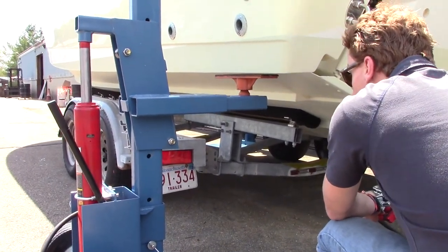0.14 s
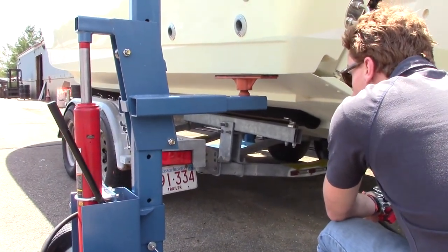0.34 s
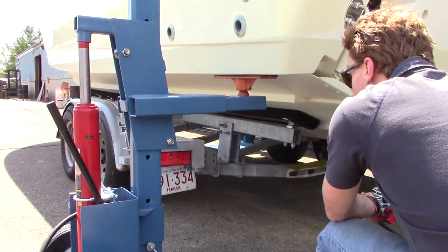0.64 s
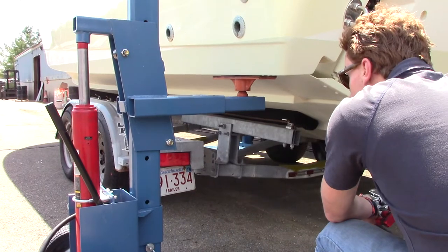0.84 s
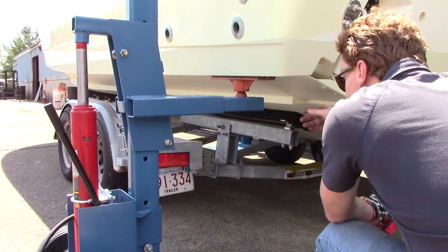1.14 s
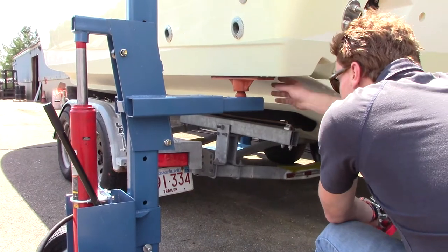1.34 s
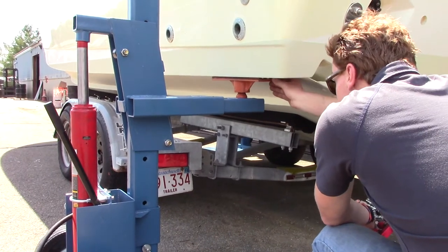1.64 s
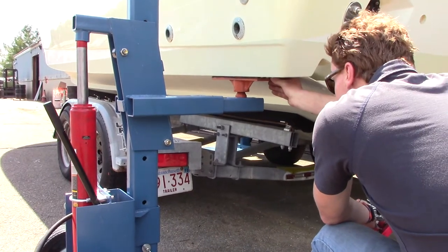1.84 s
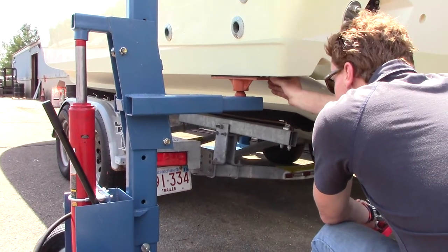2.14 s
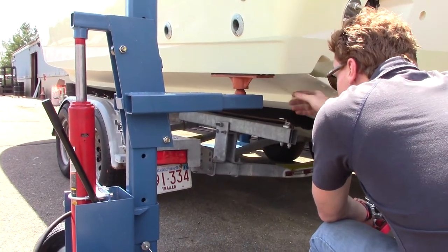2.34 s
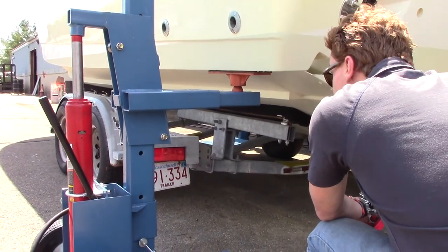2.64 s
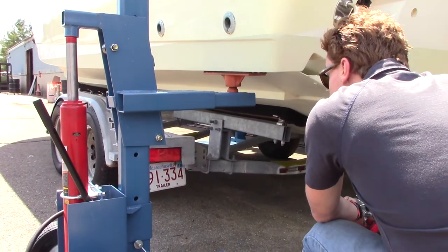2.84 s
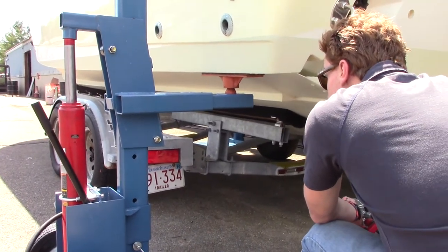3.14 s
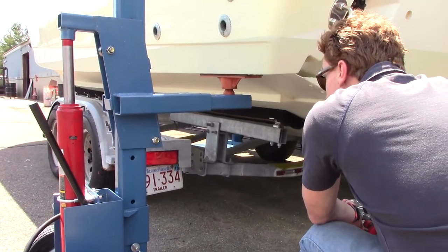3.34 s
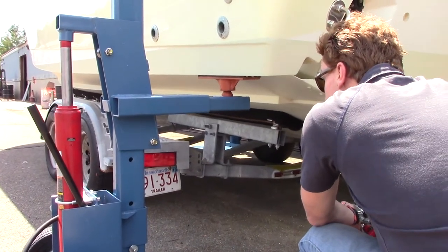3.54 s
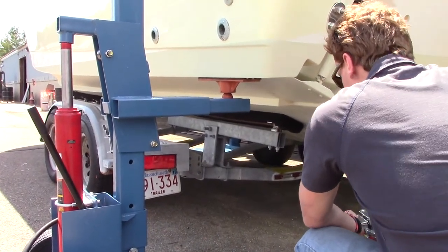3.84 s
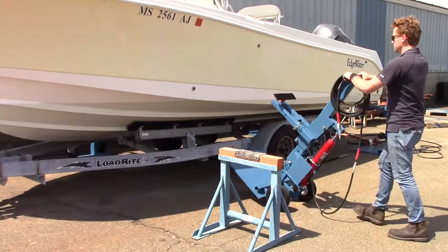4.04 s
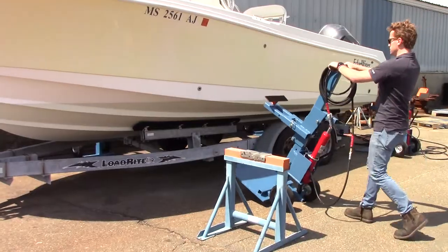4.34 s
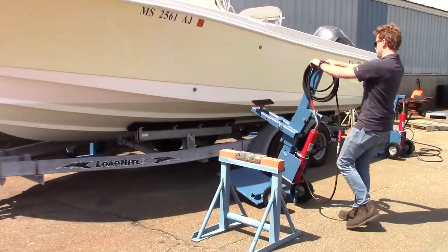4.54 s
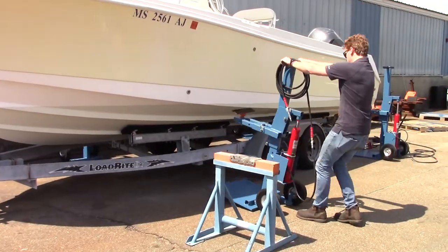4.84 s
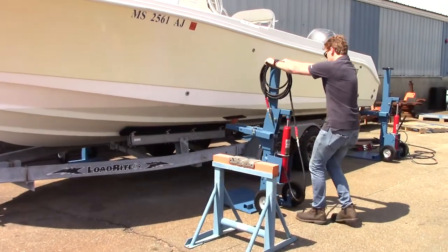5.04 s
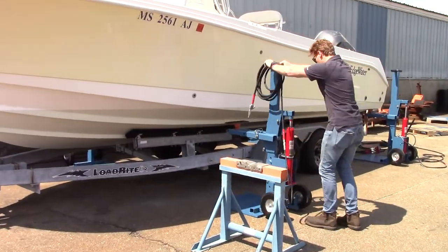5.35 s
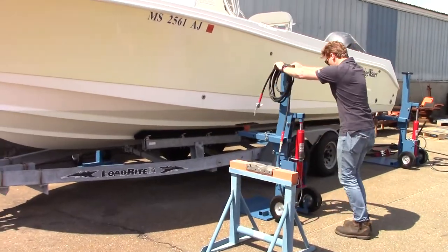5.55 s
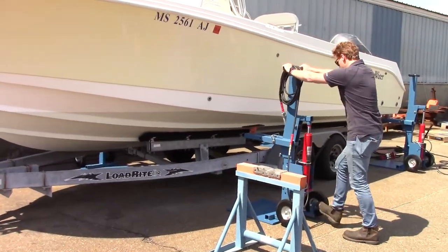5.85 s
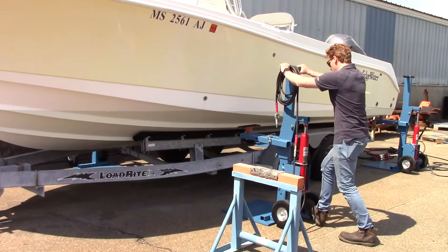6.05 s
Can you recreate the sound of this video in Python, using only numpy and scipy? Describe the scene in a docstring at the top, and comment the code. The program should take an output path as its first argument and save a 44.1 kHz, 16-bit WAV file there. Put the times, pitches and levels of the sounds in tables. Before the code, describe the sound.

In an open yard, a pneumatic jack sputters in a fast, bright chatter of air bursts, its last strokes spacing out before stopping. Low wind buffets the microphone in the pause, with a faint hoarse chirp. The pump restarts slightly unevenly, harder and more metallic, then stalls. Next comes quiet distant hiss, one soft tubular tap, wind thuds, and a cluster of loose steel clanks and grit scrapes with slight outdoor echo.

```python
"""An air-driven hydraulic jack lifts a boat in a yard: a run of rapid exhaust puffs (choked jets through
a muffler) and piston knocks (struck resonances) slows to a halt when the air is shut off, while wind
bumps the microphone (lumps of low noise). A bird chirps in the pause (gliding tones); a second run follows.
The near air then gives way to a faint, farther hiss, a steel tube is tapped (decaying modes), and
a wheeled steel jack is tipped upright and rattles into place (chattering contacts ring its frame)."""
import sys
import numpy as np
from scipy import signal
from scipy.fft import rfft, irfft
from scipy.io import wavfile
from scipy.ndimage import uniform_filter1d

SR = 44100
rng = np.random.default_rng(int(sys.argv[2]) if len(sys.argv) > 2 else 0)


def wrap_up_sound(samples):
    """Save the sound to the file named by the first command line argument, as 16-bit audio."""
    columns = np.atleast_2d(samples).T
    # keep every value between -1 and 1, then stretch to whole-number steps
    tamed = np.clip(columns, -1, 1)
    steps = np.round(tamed * 32767).astype(np.int16)
    wavfile.write(sys.argv[1], SR, steps)


N = 272979
T = np.arange(N) / SR  # s
HZ = np.maximum(np.arange(N // 2 + 1) * SR / N, 1)

# Most spectra and mode levels are relative; the tube's mode levels are used as they stand.
# yard air beside the boat: frequency_hz, density_db (per Hz)
NEAR_AIR_SPECTRUM = [(18, -71), (30, -61), (131, -11.5), (384, -7), (426, -7), (600, -13.5), (889, -12),
                     (1430, -16), (2610, -20.5), (4080, -22), (4780, -24), (12300, -28), (16000, -41)]
# hiss from farther off: frequency_hz, density_db (per Hz)
FAR_AIR_SPECTRUM = [(30, -30), (100, -20), (200, -12.5), (300, 0.5), (480, 0.5), (700, 2), (1400, -2.5),
                    (3800, -5.5), (5100, -11.5), (6300, -4), (8500, -3.5), (10200, -8), (11600, -17),
                    (14000, -16), (16000, -26)]
NEAR_DB, FAR_DB = -43.5, -43.5  # rms levels
MOVE_S = 3.98  # the near air starts to give way to the far hiss

# runs of the pump: first_stroke_s, air_shut_off_s, stroke_rate_hz
PUMP_RUNS = [(.0018, .914, 19.373), (2.6238, 3.4075, 18.684)]
# levels of each run at full pressure, before trims: exhaust_db, casing_ring_db, piston_thud_db, casing_buzz_db
PUMP_LEVELS = [(-8, -27, -42.5, -35), (-5, -19, -29, -29.5)]
# brief falters of the pump: middle_s, rate_loss_hz
PUMP_FALTERS = [(2.658, 4.6), (2.9022, 4.033), (3.2068, 1.316)]
FALTER_S = .0736  # half length
# with the air off the rate falls steadily (strokes/s per s) until the piston stalls (strokes/s)
COAST_LOSS, STALL_RATE = 29.59, 3
FILL_S = 0.041  # air flows this long before the first stroke
EARLY_S = .0025  # at full pressure the exhaust port opens this far ahead of the end of the stroke
# as the pressure drains, strokes tend to one slow, full puff and a hard knock (dB before trims)
SLOW_PUFF_DB, SLOW_RING_DB = -2.5, -13
# shape of a puff: how fast the port opens, how steeply the flow collapses
OPENING, COLLAPSE = 20, 2.6
# exhaust jet: frequency_hz, density_db (per Hz)
JET_SPECTRUM = [(500, -36), (800, -43), (1100, -31), (1700, -9), (2500, -9), (3400, -5.5), (4800, -11.5),
                (5800, -4.5), (6900, 2), (8700, 0.5), (10000, -8), (11300, -15.5), (13000, -19.5),
                (16000, -25.5)]
# peaks and notches of the muffler: frequency_hz, width_hz (before the lower limit), gain_db
MUFFLER_PEAKS = [(2324, 116, -12), (2596, 190, -5.5), (3190, 70, 3.5), (3617, 200, 7.5), (3750, 77, -9),
                 (4010, 210, -5), (4140, 84, 7), (4680, 450, -0.5), (4840, 250, -4), (5460, 290, 3),
                 (5510, 230, 2.5), (5660, 290, -4.5), (5840, 380, -2), (6010, 123, 7), (6620, 210, -1),
                 (6890, 160, 1.5), (7440, 200, -2.5), (7600, 120, -7), (8130, 120, -7.5), (8145, 63, 7.5),
                 (9300, 91, -3), (9730, 90, -6), (10700, 160, -4), (11400, 220, -7), (12150, 360, 4)]
NARROWEST_HZ = 70  # lower limit of the muffler widths
# modes of the pump casing: frequency_hz, width_hz, level_db
CASING_MODES = [(834.4, 28, 1), (916, 39, 3.5), (989, 17, -6), (1235, 81, -7.5), (1306, 51, -1),
                (1379, 32, -10), (1617, 76, -1), (1793, 53, -6.5), (1905, 200, -5.5), (2110, 71, 0),
                (2273, 140, 2), (2522, 62, -1.5)]
# modes of the piston thud: frequency_hz, width_hz, level_db
PISTON_MODES = [(202, 35, 4), (322, 220, 6), (445, 84, 3.5)]

# wind eddies: frequency_hz, density_db (per Hz)
WIND_SPECTRUM = [(30, -35), (60, -8), (110, -9.5), (170, -1), (290, 1.5), (420, -6.5), (600, -11.5),
                 (1000, -37), (2000, -48)]
# strongest wind bumps: start_s, peak_db (before trim), pitch_hz, rise_s
WIND_BUMPS = [(0.042, -34, 226, 0.0092), (0.502, -24.5, 272.8, 0.0037), (1.466, -31.5, 267.2, .0066),
              (1.576, -22, 319.5, 0.0026), (1.61, -32, 315, 0.0084), (1.656, -16.5, 282.2, 0.0067),
              (1.7, -27, 266.4, 0.012), (1.772, -29, 208, 0.0066), (2.428, -31.5, 349.7, 0.01),
              (2.489, -29, 298.2, 0.0076), (2.553, -23, 275.6, 0.0074), (3.925, -14, 213.6, 0.011),
              (5.237, -18, 299.1, .0072), (5.278, -21.5, 397, 0.015), (5.302, -15.5, 268, .011),
              (5.351, -18, 283, 0.0087), (5.769, -19, 247, 0.011), (5.789, -22.5, 407, 0.0094),
              (6.174, -20, 366.7, 0.01)]
# gusts: middle_s, level_db (before trim), half_length_s
WIND_GUSTS = [(1.33, -39.5, 0.22), (1.68, -33, 0.061), (2.0, -47.5, 0.24), (2.56, -35, 0.14),
              (3.15, -37.5, 0.51), (3.72, -29.5, 0.23), (5.28, -38, 0.23), (5.84, -38, 0.18)]
WIND_HZ = 271.2  # pitch of the average eddy
LOW_CUT_HZ = 95  # the microphone passes little wind below this pitch
CALM_DB, LUMPY_DB = -56.5, 3.5  # breeze between gusts (before trim), and how lumpy the wind is

# bird syllables: start_s, length_s, start_pitch_hz, top_pitch_hz, level_db (before trim)
BIRD_CHIRPS = [(1.876, 0.041, 4160, 4450, -33), (1.934, .02, 3570, 3960, -33),
               (1.957, .054, 2700, 4440, -36)]
# each syllable rises to its top at this share of its length, then drops to one closing pitch
CHIRP_TURN, CHIRP_END_HZ = .6, 2900

TAP_S = 4.063
# modes of the tapped steel tube: frequency_hz, level_db, t60_s
TUBE_MODES = [(296, -44, 2), (716, -41.5, .7), (877, -58, 0.45), (1583, -39, .08), (2218, -42, .25),
              (2400, -43, .07)]

# blows on the wheeled jack: start_s, clank_db, clank_pitch_hz, bright_rattle_db (before trims)
JACK_BLOWS = [(5.012, -23.5, 1860, -24), (5.037, -21.5, 2600, -17.5), (5.163, -22.5, 2374, -30.5),
              (5.214, -25, 1500, -31), (5.247, -22, 1650, -24), (5.315, -21, 2064, -34),
              (5.332, -14.5, 2150, -34), (5.342, -13.5, 1550, -44), (5.361, -16.5, 1430, -46),
              (5.504, -31.5, 2000, -38), (5.515, -31.5, 1720, -41), (5.54, -39, 2320, -56),
              (5.874, -14, 2730, -25.5), (6.133, -35, 1392, -43), (6.163, -28, 1376, -41)]
# modes of its steel frame: frequency_hz, width_hz, level_db
FRAME_MODES = [(346.2, 17, 20), (663.7, 19.5, -9), (1039.5, 33, 9), (1335, 30, 10), (1450, 23.5, -2),
               (1590, 13.7, 11), (1686, 23, 3), (1932, 63, 14.5), (2060, 18, -18), (2280, 20, -17),
               (2390, 35, 11), (2500, 73, 6), (2670, 32.8, 6), (2880, 42, -7), (3230, 26, 7),
               (3460, 18, -9), (3760, 51, 13.5), (6340, 62, 14.5), (7260, 64, 12)]
# wheels and steel foot scrape over gritty asphalt: middle_s, level_db (before trims), half_length_s
JACK_SCRAPES = [(5.04, -32.5, .04), (5.18, -34, 0.073), (5.26, -27.5, 0.032), (5.358, -29, 0.025),
                (5.89, -39.5, 0.15), (6.18, -34.5, 0.067)]
# grit: frequency_hz, gain_db
GRIT_SPECTRUM = [(60, -53), (400, -4), (1000, -3.5), (1600, -4.5), (3200, -2.5), (4800, -11), (8000, -13.5),
                 (14000, -37)]
# every blow dies at the same rate and weakens away from its pitch
CLANK_DECAY_S, CLANK_LOSS_DB_PER_OCTAVE = 0.014, 16

# phase between the two channels: frequency_hz, left_lead_rad
CHANNEL_LEAD = [(3800, 0), (6000, .14), (8500, .23), (10000, .45), (11500, 0)]
# level between the channels: frequency_hz, left_minus_right_db
CHANNEL_TILT = [(4500, 0), (6000, .5), (9000, .2), (10500, 2), (13000, 0)]
# stereo width: frequency_hz, side_level_db (relative to the shared sound)
STEREO_WIDTH = [(100, -45), (400, -42), (1000, -36), (3000, -33), (4800, -16), (6500, -21), (8500, -19.5),
                (11000, -11), (13000, -25)]
WIND_SIDE_DB = -25  # stereo width of the wind, relative to the shared wind
CUTOFF_HZ = 15900


def from_db(db):
    """A level in decibels is a logarithm of amplitude; return the gain."""
    return 10 ** (np.asarray(db) / 20)


def rms_one(x):
    """Dividing by the root mean square leaves unit power."""
    return x / np.sqrt(np.mean(x ** 2) + 1e-20)


def at_hz(points):
    """A spectrum interpolated along log frequency, at every frequency bin."""
    hz, value = np.transpose(points)
    return np.interp(np.log(HZ), np.log(hz), value)


def noise(spectrum):
    """White noise weighted by a spectrum is coloured noise, rms 1."""
    spectrum_of_white = rfft(rng.standard_normal(N))
    return rms_one(irfft(spectrum_of_white * from_db(at_hz(spectrum)), N))


def band(x, low_hz, high_hz):
    """A causal band-pass keeps the frequencies between two limits."""
    edges = [low_hz, min(high_hz, .45 * SR)]
    return signal.sosfilt(signal.butter(2, edges, "band", fs=SR, output="sos"), x)


def bursts(times, levels_db, lengths, shape):
    """Independent bursts add in power; shape takes the age in lengths."""
    power = np.zeros(N)
    lengths = np.maximum(lengths + 0 * times, 1e-3)
    for s, level_db, length in zip(times, levels_db, lengths):
        span = slice(max(int(s * SR) + 1, 0), int((s + 10 * length) * SR))
        age = np.maximum(T[span] - s, 0) / length
        power[span] += (from_db(level_db) * shape(age)) ** 2
    return np.sqrt(power)


def fade(age):
    """A struck body starts suddenly and decays exponentially."""
    return np.exp(-age)


def swell(age):
    """A passing eddy gives a rounded bump that tops at age 1 and trails off."""
    return age ** 2 * np.exp(2 - 2 * age)


def swells(rows):
    """Smooth Gaussian rises and falls add in power."""
    power = sum((from_db(level_db) * np.exp(-((T - s) / length) ** 2)) ** 2 for s, level_db, length in rows)
    return np.sqrt(power)


def resonate(x, modes):
    """Parallel resonances share out the power of white noise by the modes' levels."""
    out = 0
    for hz, width, level_db in modes:
        r = np.exp(-np.pi * width / SR)  # pole radius
        poles = [1, -2 * r * np.cos(2 * np.pi * hz / SR), r * r]
        gain = from_db(level_db) * np.sqrt((1 - r * r) / 2)
        out = out + gain * signal.lfilter([1, 0, -1], poles, x + 1e-18)
    return out / np.linalg.norm(from_db(np.array(modes)[:, 2]))


def yard(x, wet_db, t60, bright_t60, first_s):
    """Diffuse scatter from hull, trailer and sheds decays exponentially; the treble dies sooner."""
    t = T[:SR]
    dull = band(rng.standard_normal(SR), 225, 5600) * from_db(-60 * t / t60)
    bright = band(rng.standard_normal(SR), 2300, 15200) * from_db(-60 * t / bright_t60)
    tail = (dull + bright) * np.minimum(t / first_s, 1) ** 2
    return x + from_db(wet_db) * signal.fftconvolve(x, tail / np.linalg.norm(tail))[:N]


def background():
    """Outdoor air is steady broadband noise; the near air gives way to a distant hiss."""
    far = np.clip((T - MOVE_S) / 0.024, 0, 1)
    near_air = from_db(NEAR_DB) * noise(NEAR_AIR_SPECTRUM)
    far_air = from_db(FAR_DB) * noise(FAR_AIR_SPECTRUM)
    return (1 - far) * near_air + far * far_air


def motor():
    """Stroke times integrate the stroke rate; the pressure (0-1) goes with the square of that rate."""
    times, pressure = [], 0
    falter = sum(loss * np.exp(-((T - s) / FALTER_S) ** 2) for s, loss in PUMP_FALTERS)
    for start, shut, full_rate in PUMP_RUNS:
        coast = COAST_LOSS * np.maximum(T - shut, 0)
        rate = np.maximum(full_rate - falter - coast, 0)
        begun = np.ceil(np.cumsum(rate * (T >= start)) / SR)  # strokes begun so far
        times += list(T[(np.diff(begun, prepend=0) > 0) & (rate > STALL_RATE)])
        filling = np.clip((T - start + FILL_S) / 0.022, 0, 1)
        pressure = pressure + (rate / full_rate) ** 2 * filling
    return np.array(times), pressure


def run_levels(times):
    """Each run has its own strength: the four levels of the run under way at these times."""
    starts = np.array(PUMP_RUNS)[:, 0] - FILL_S
    return np.array(PUMP_LEVELS)[np.searchsorted(starts, times) - 1].T


def linger(envelope, t60):
    """In a diffuse echo the power of a noise builds up and leaks away exponentially."""
    r = from_db(-120 / (t60 * SR))  # 120, since it acts on power
    return np.sqrt(signal.lfilter([1 - r], [1, -r], envelope ** 2 + 1e-18))


def muffle(x):
    """Muffler resonances and cancellations form a chain of narrow peaks and notches."""
    for hz, width, level_db in MUFFLER_PEAKS:
        g = from_db(level_db / 2)
        c = -2 * np.cos(2 * np.pi * hz / SR)
        a = np.pi * max(width, NARROWEST_HZ) / SR
        x = signal.lfilter([1 + a * g, c, 1 - a * g], [1 + a / g, c, 1 - a / g], x + 1e-18)
    return x


def puff(age):
    """Choked flow rises as the port opens, holds, then collapses."""
    return (1 - np.exp(-age * OPENING)) * np.exp(-.8 * age ** COLLAPSE)


def exhaust(s, pressure, puff_s=0.016, feed_s=0.018, jet_db=-3.5, leak_db=-15.0,
            echo_db=-10, echo_t60=0.19, dull_db=-18, dull_t60=0.36, feed_power=0.9):
    """Each stroke dumps the air cylinder, and the turbulent jet makes noise as it flows."""
    valve = pressure ** feed_power
    drive = np.interp(s, T, valve)
    run_db = run_levels(s)[0]
    exhaust_db = run_db + (SLOW_PUFF_DB - run_db) * (1 - drive) ** 3
    lengths = puff_s + feed_s * drive  # an open valve feeds the puff a little longer
    puffs = bursts(s - EARLY_S * drive, exhaust_db, lengths, puff)
    leak = from_db(run_levels(T)[0] + leak_db) * valve
    flow = from_db(jet_db) * np.hypot(puffs, leak)
    # hull and ground scatter the hiss back; its lower part lasts longest
    jet = np.hypot(flow, from_db(echo_db) * linger(flow, echo_t60)) * noise(JET_SPECTRUM)
    low_hiss = rms_one(band(rng.standard_normal(N), 920, 4260))
    dull = from_db(dull_db) * linger(flow, dull_t60) * low_hiss
    return muffle(jet + dull)


def pump(casing_db=-3, rebound_s=.013, rebound_db=-3, thud_db=26, slow_thud_db=-5,
         ring_scatter_db=3, thud_scatter_db=4.0, buzz_power=.8):
    """Impact excites modes: the piston knocks at its stop, the cylinder vents, the piston slaps back."""
    s, pressure = motor()
    drive = np.interp(s, T, pressure)
    _, ring_db, knock_db, _ = run_levels(s)
    chance = rng.standard_normal((len(s), 2))
    ring_db = SLOW_RING_DB + drive * (ring_db - SLOW_RING_DB + ring_scatter_db * chance[:, 0])
    knock_db = knock_db + slow_thud_db * (1 - drive) + thud_scatter_db * chance[:, 1]
    knocks = s - .004 * drive  # a hard-driven piston arrives just ahead of the exhaust
    contacts = bursts(knocks, ring_db, 0.0065, fade)
    contacts = contacts + bursts(s + rebound_s, ring_db + rebound_db, 0.023, fade)
    buzz = from_db(run_levels(T)[-1]) * pressure ** buzz_power  # the casing buzzes while air flows
    shaking = np.hypot(from_db(casing_db) * contacts, buzz) * rng.standard_normal(N)
    casing = resonate(shaking, CASING_MODES)
    pushes = np.zeros(N)
    pushes[np.maximum(knocks * SR, 0).astype(int)] = from_db(knock_db + thud_db)
    thuds = band(resonate(pushes, PISTON_MODES), 157, 470)
    return exhaust(s, pressure) + band(casing, 880, 12600) + thuds


def wind(gust_db=-4, bump_db=-3):
    """Eddies at the microphone port: a lumpy murmur and single bumps, higher when they pass faster."""
    s, peak_db, hz, length = np.transpose(WIND_BUMPS)
    eddies = signal.hilbert(noise(WIND_SPECTRUM))
    # evened in level, then read faster or slower
    even = eddies.real / np.sqrt(uniform_filter1d(np.abs(eddies) ** 2, size=400) / 2)
    travel = np.cumsum(np.interp(T, s + length, hz) / WIND_HZ) % N
    passing = np.interp(travel, np.arange(N), even)
    bumps = bursts(s, peak_db + bump_db, length, swell) * passing
    breeze = np.hypot(swells(WIND_GUSTS), from_db(CALM_DB))
    lumps = rms_one(band(rng.standard_normal(N), 7, 26))
    murmur = breeze * from_db(gust_db + LUMPY_DB * lumps) * noise(WIND_SPECTRUM)
    return signal.sosfilt(signal.butter(2, LOW_CUT_HZ, "high", fs=SR, output="sos"), murmur + bumps)


def bird(level_db=-5, waver_hz=170, crescendo_db=6):
    """Frequency modulation: three arched, hoarse whistles from some way off, weighted to their ends."""
    out = 0
    for s, length, start_hz, top_hz, db in BIRD_CHIRPS:
        age = np.clip((T - s) / length, 0, 1)
        arch = np.sqrt(4 * age * (1 - age))
        gain = from_db(db + level_db + crescendo_db * (age - 1.5)) * arch
        glide = np.interp(age, [0, CHIRP_TURN, 1], [start_hz, top_hz, CHIRP_END_HZ])
        pitch = glide + waver_hz * rms_one(band(rng.standard_normal(N), 80, 368))
        out = out + gain * np.sin(2 * np.pi * np.cumsum(pitch) / SR)
    return yard(out, wet_db=-16, t60=0.32, bright_t60=0.28, first_s=.02)


def tube_tap():
    """A lightly struck tube vibrates freely in a few modes, each with its own decay."""
    age = np.maximum(T - TAP_S, 0)
    modes = 0
    for hz, level_db, t60 in TUBE_MODES:
        modes = modes + from_db(level_db - 60 * age / t60) * np.sin(2 * np.pi * hz * age)
    return modes * (1 - np.exp(-age / 0.00096))  # soft onset


def gritty(grains_per_s, spread_db, smooth_db):
    """Random impulses model tiny contacts of uneven size, over a smooth hiss, rms 1."""
    sizes = from_db(spread_db * np.minimum(rng.exponential(1, N), 4)) * rng.choice([-1, 1], N)
    grains = rms_one(sizes * (rng.random(N) < grains_per_s / SR))
    return rms_one(grains + from_db(smooth_db) * rng.standard_normal(N))


def scrape(grit_db=-2, frame_db=-8):
    """Stick-slip friction: grit catches and slips under the jack and shakes its frame."""
    contacts = gritty(grains_per_s=340, spread_db=3.5, smooth_db=1)
    grit = rms_one(irfft(rfft(contacts) * from_db(at_hz(GRIT_SPECTRUM)), N))
    shaken = rms_one(resonate(grit, FRAME_MODES))
    return swells(JACK_SCRAPES) * (from_db(grit_db) * grit + from_db(frame_db) * shaken)


def wheeled_jack(ring_db=-10, crack_db=-3, tick_db=1, tick_s=0.0026, rattle_db=-0.5):
    """Repeated impact: loose steel parts chatter briefly at each blow and set the frame ringing."""
    s, clank_db, hz, high_db = np.transpose(JACK_BLOWS)
    contacts = gritty(grains_per_s=2500, spread_db=-1.0, smooth_db=-2)
    rattle = rms_one(band(contacts, 5800, 8900))
    chatter = bursts(s, high_db + rattle_db, CLANK_DECAY_S, fade) * rattle
    for low_hz, high_hz in [(950, 2330), (2000, 3400)]:
        octaves_away = np.abs(np.log2(hz / np.sqrt(low_hz * high_hz)))
        level_db = clank_db - CLANK_LOSS_DB_PER_OCTAVE * octaves_away
        clank = rms_one(band(contacts, low_hz, high_hz))
        chatter = chatter + bursts(s, level_db, CLANK_DECAY_S, fade) * clank
    tick_noise = rms_one(band(rng.standard_normal(N), 220, 6000))
    ticks = bursts(s, high_db + tick_db, tick_s, fade) * tick_noise
    frame = from_db(ring_db) * resonate(chatter + ticks, FRAME_MODES)
    jack = from_db(crack_db) * chatter + ticks + frame + scrape()
    return yard(jack, wet_db=-19.5, t60=0.55, bright_t60=0.25, first_s=0.027)


def scene():
    """Superposition in two nearly equal channels, with slight stereo width in the treble."""
    mix = rfft(background() + pump() + wind() + bird() + tube_tap() + wheeled_jack())
    channel = from_db(at_hz(CHANNEL_TILT) / 2) * np.exp(.5j * at_hz(CHANNEL_LEAD))
    blur = rng.standard_normal(SR // 50)
    width = rfft(blur / np.linalg.norm(blur), N) * from_db(at_hz(STEREO_WIDTH))
    # the side, with a little further wind, enters the channels with opposite sign
    side = mix * width + from_db(WIND_SIDE_DB) * rfft(wind())
    return irfft([mix * channel + side, mix / channel - side], N)


def record(dry):
    """Saturation rounds the highest peaks, and a steep low-pass cuts the top."""
    rounded = dry / (1 + dry ** 6) ** (1 / 6)
    return signal.sosfilt(signal.ellip(10, .1, 70, CUTOFF_HZ, fs=SR, output="sos"), rounded)


dry = scene()
out = record(dry)
wrap_up_sound(out)
```